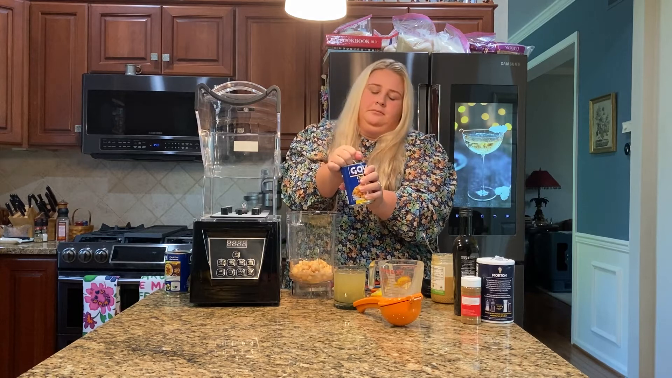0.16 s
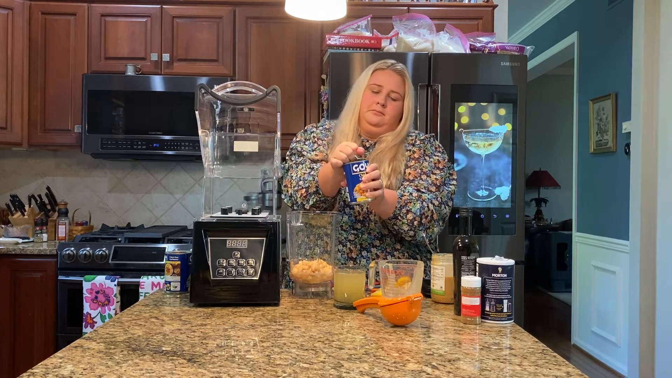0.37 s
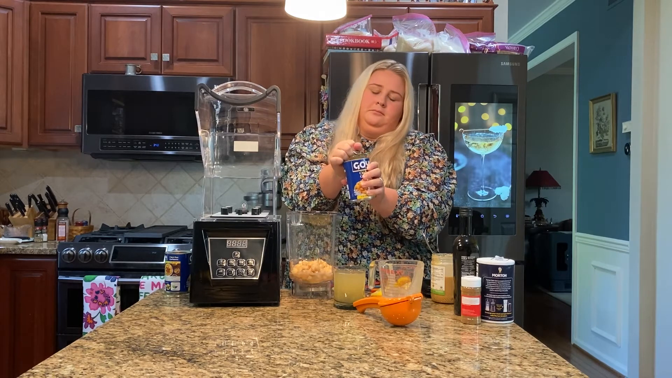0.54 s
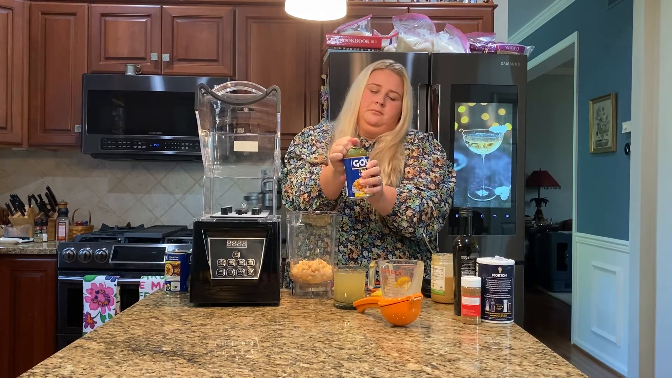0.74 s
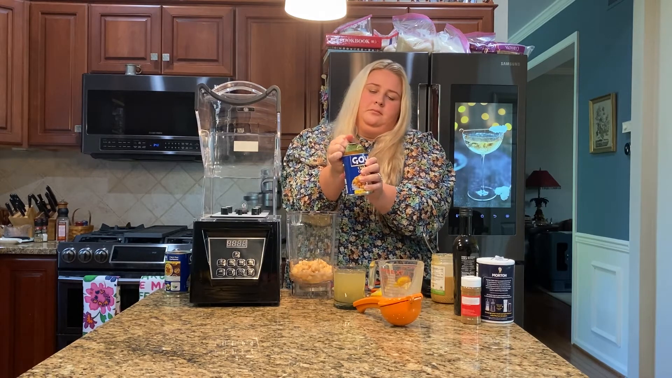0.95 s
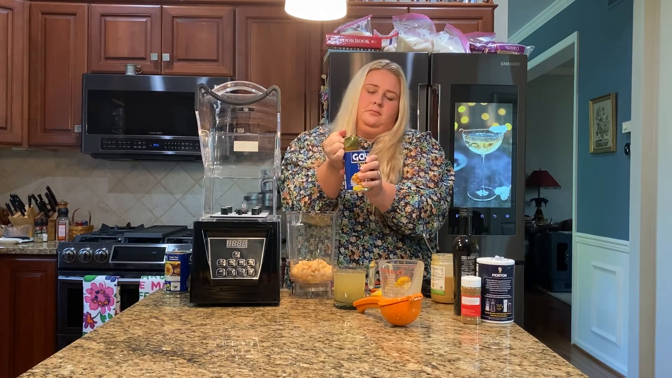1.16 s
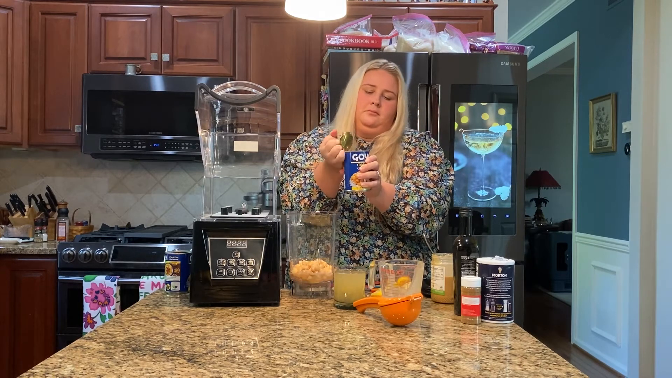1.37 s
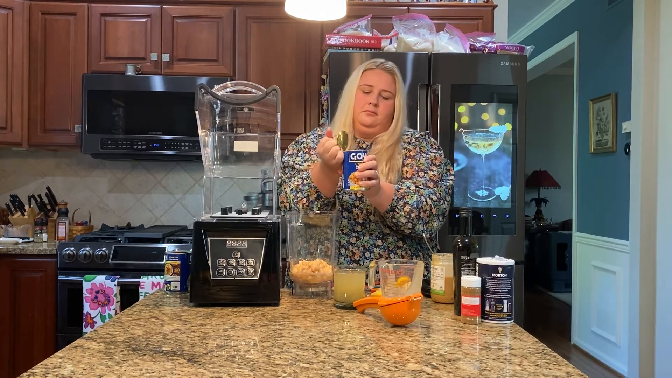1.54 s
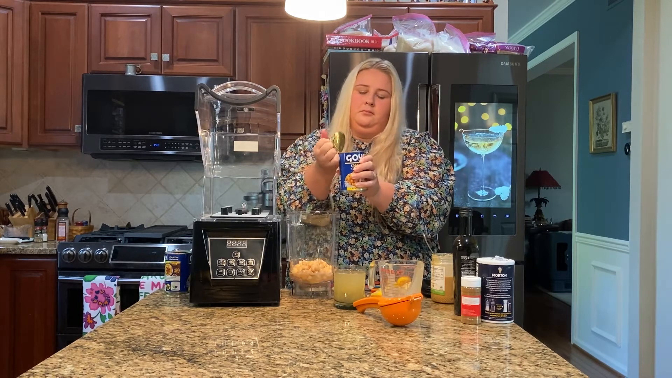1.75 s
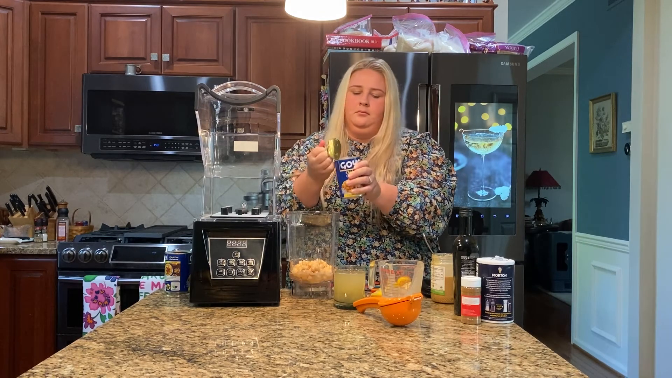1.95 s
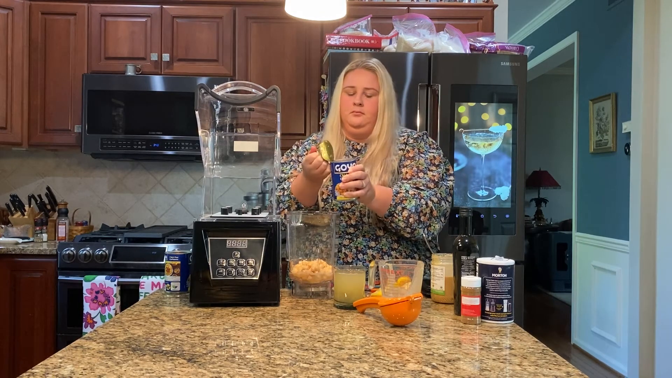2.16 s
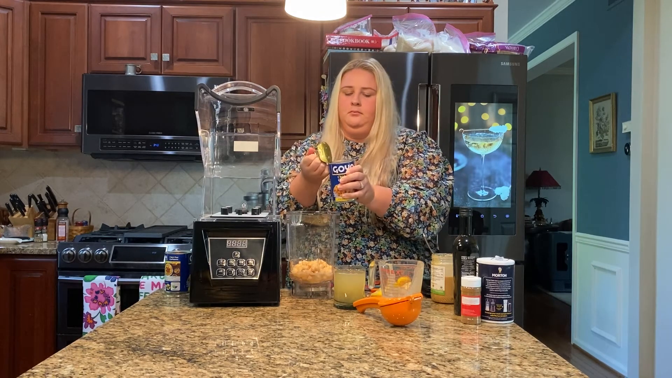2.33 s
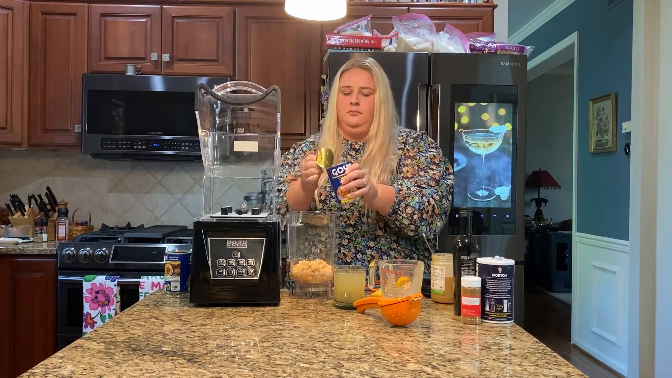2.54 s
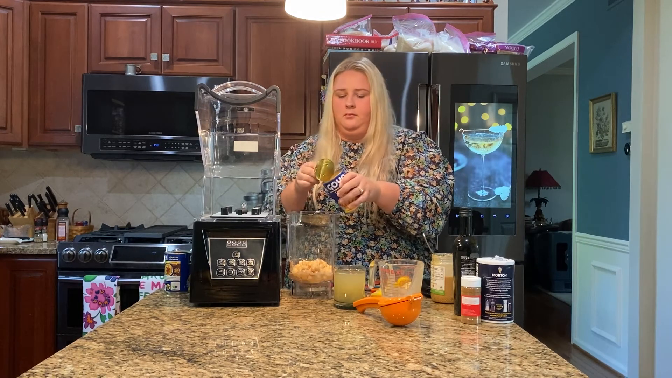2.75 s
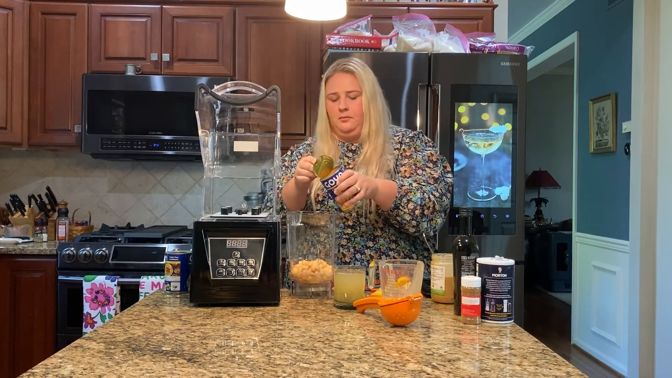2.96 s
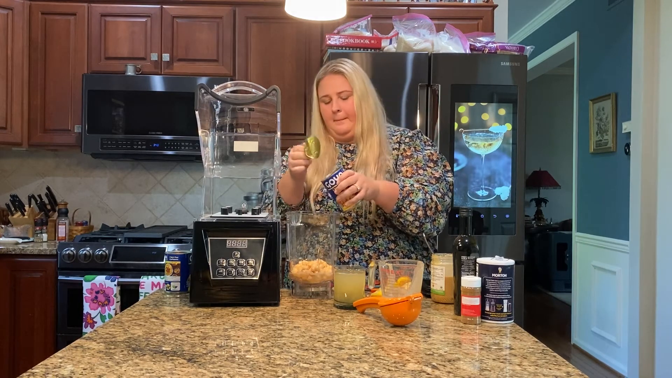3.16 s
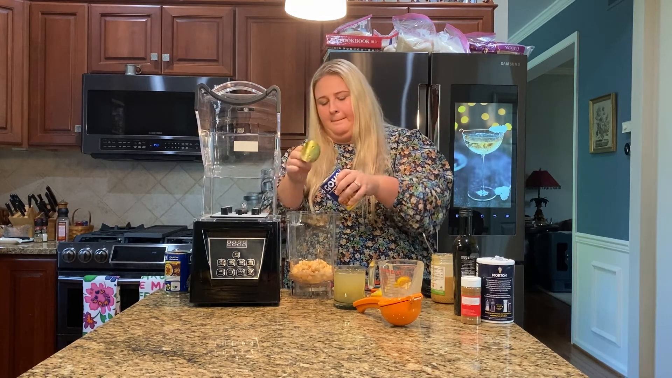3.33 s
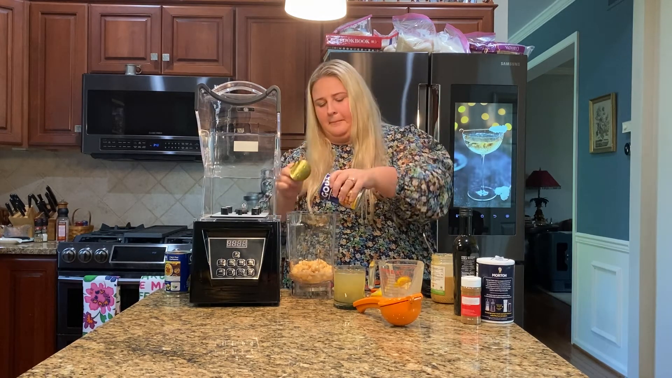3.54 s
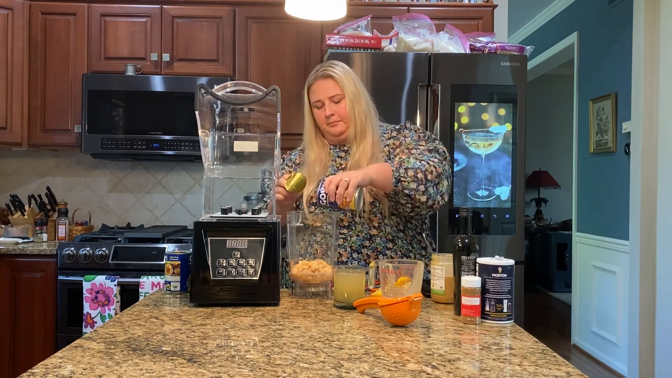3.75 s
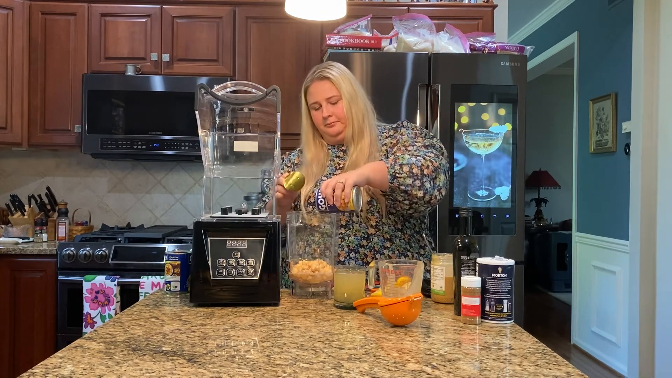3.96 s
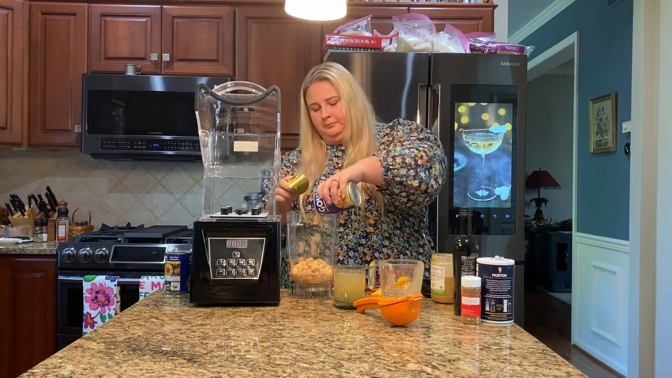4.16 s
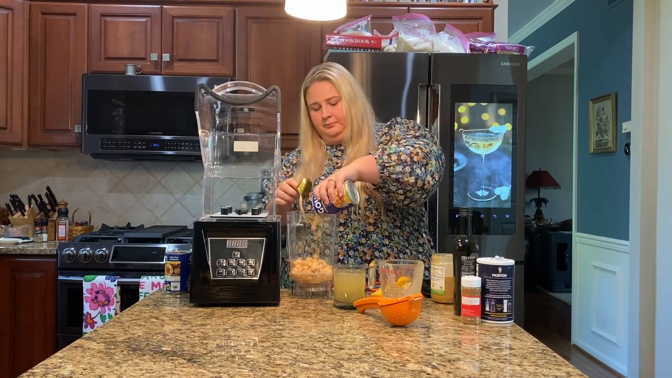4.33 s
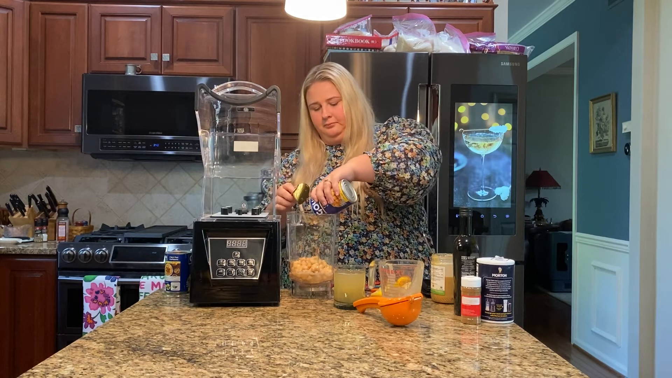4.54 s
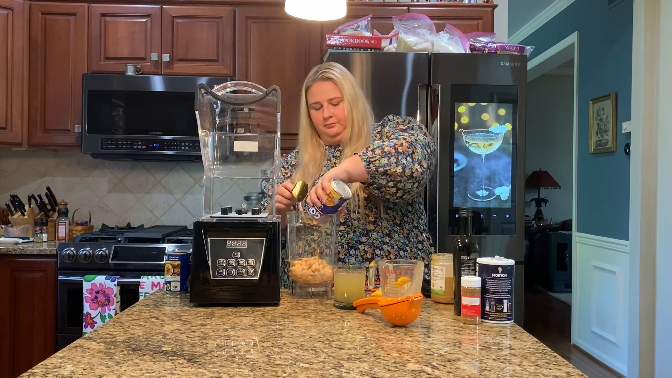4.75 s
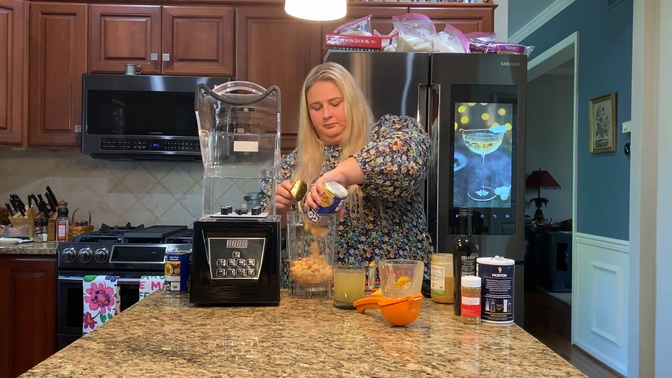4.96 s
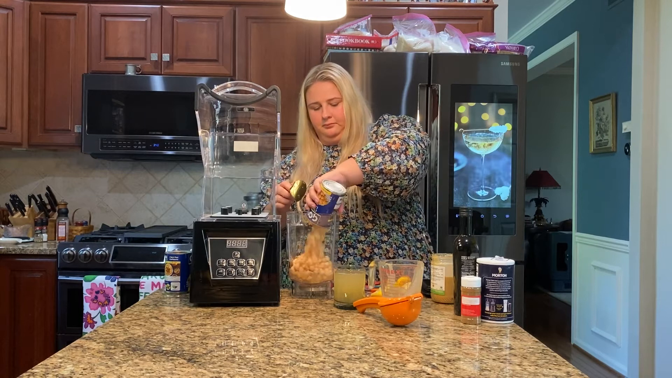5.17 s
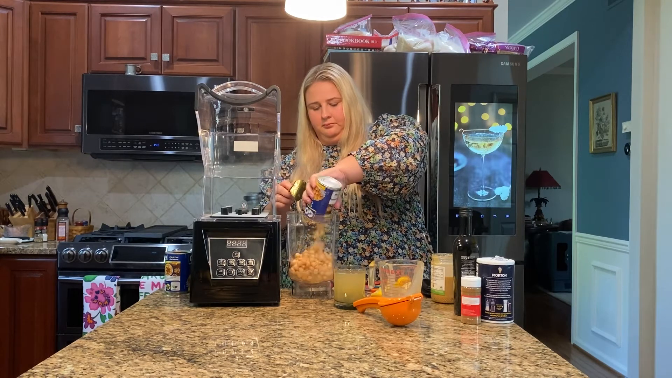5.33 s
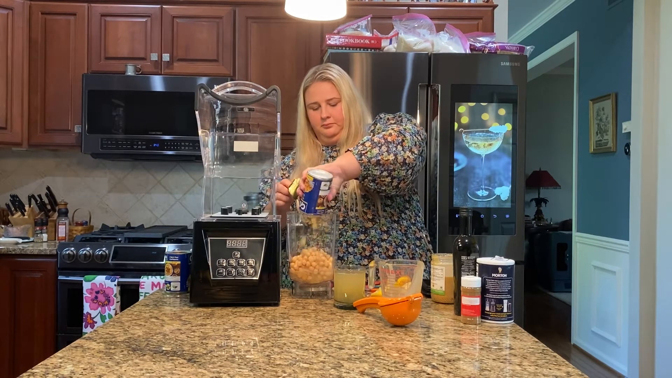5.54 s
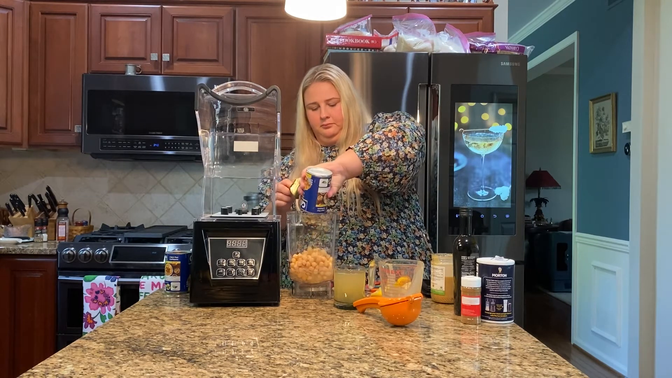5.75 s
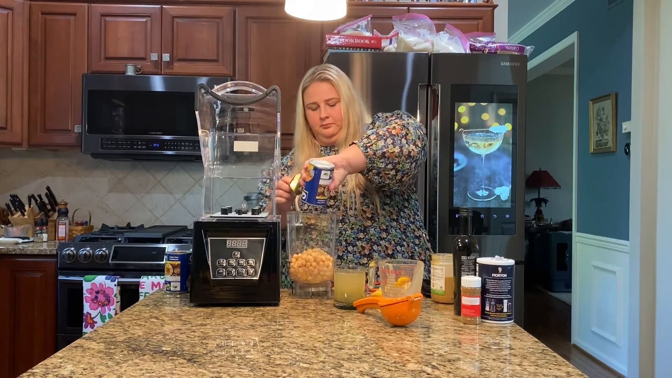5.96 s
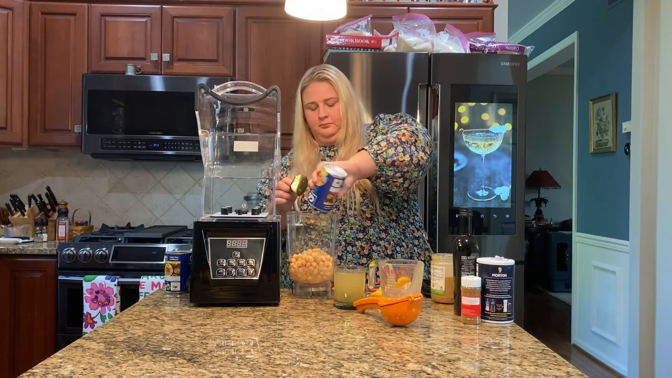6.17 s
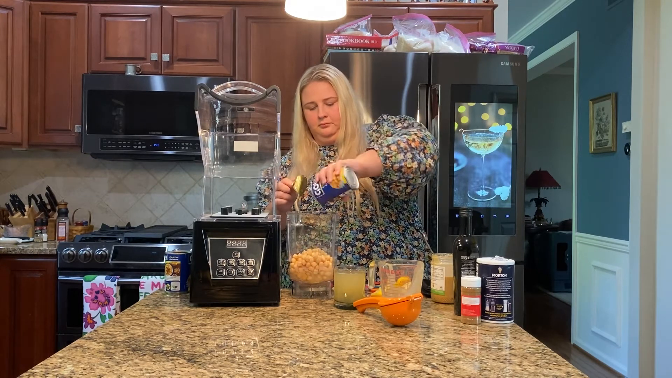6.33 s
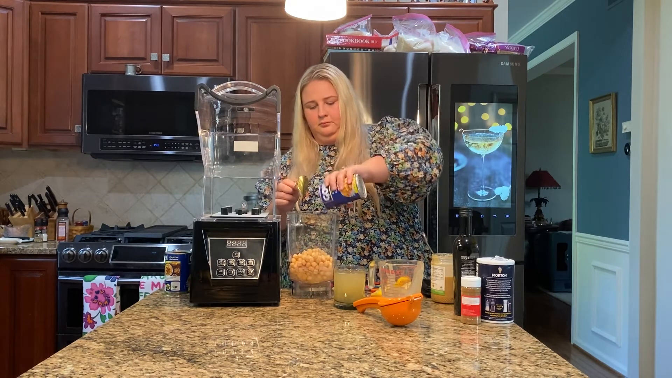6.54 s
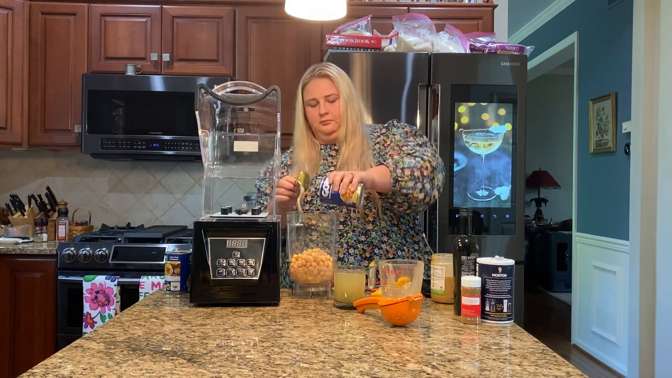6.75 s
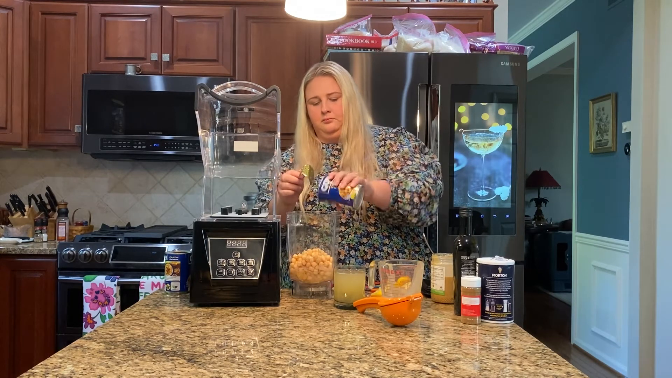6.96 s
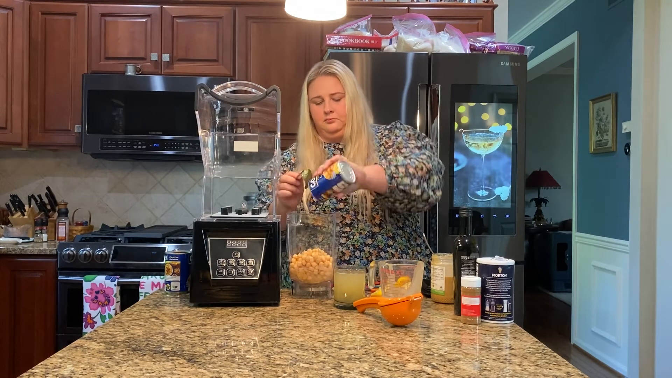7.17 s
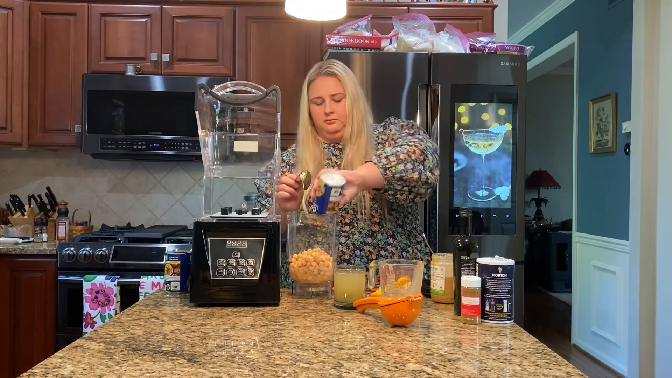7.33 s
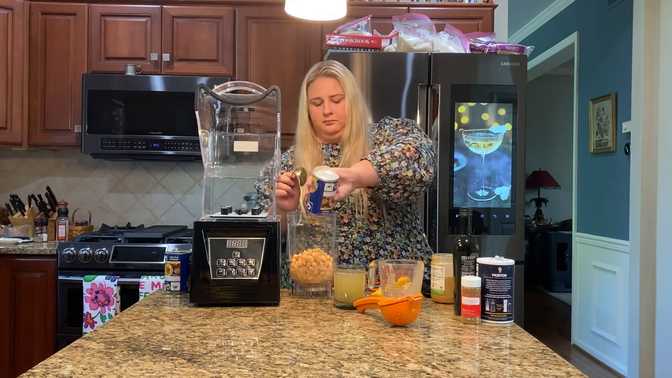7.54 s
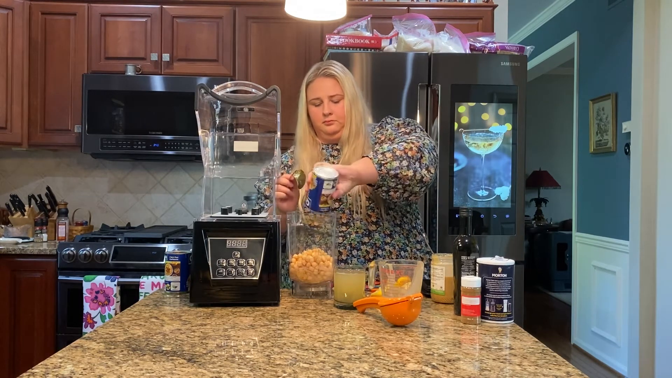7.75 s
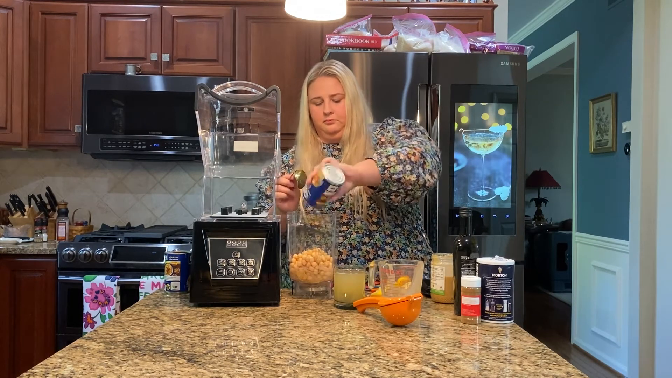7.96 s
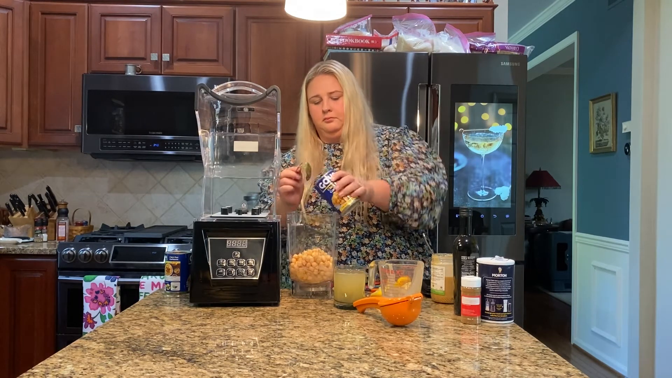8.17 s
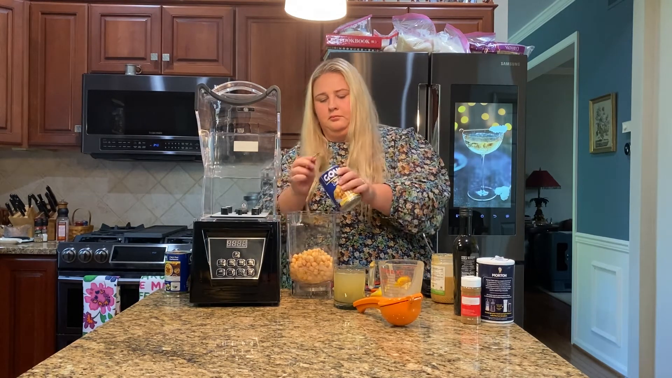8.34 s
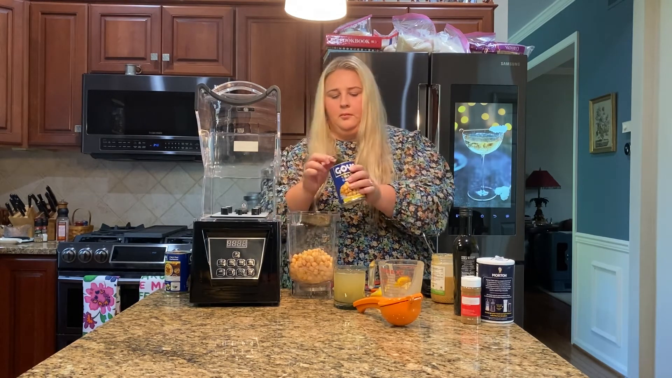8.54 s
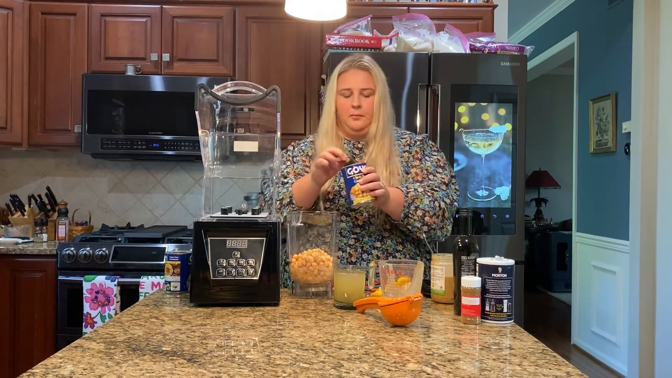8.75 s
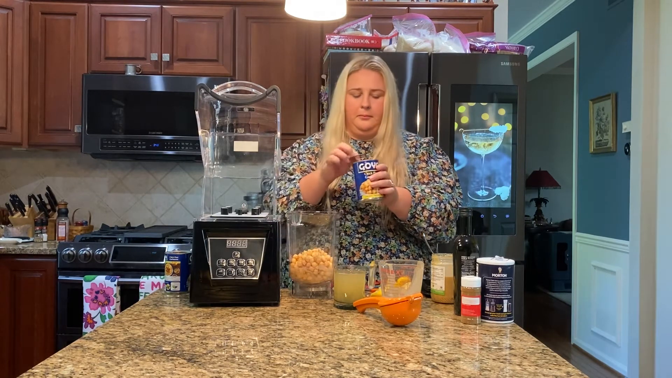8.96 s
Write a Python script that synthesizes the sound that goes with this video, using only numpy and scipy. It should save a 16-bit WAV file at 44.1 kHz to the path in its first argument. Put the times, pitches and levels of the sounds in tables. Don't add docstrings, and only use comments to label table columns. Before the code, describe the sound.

Close tin lid tearing and popping free, two wet clumps booming into a tall container, can knocked three times, lid clinking inside, fridge humming.

```python
import sys
import numpy as np
from scipy import signal
from scipy.fft import rfft, irfft, next_fast_len
from scipy.io import wavfile
from scipy.ndimage import uniform_filter1d, map_coordinates

SR = 44100
rng = np.random.default_rng(int(sys.argv[2]) if len(sys.argv) > 2 else 0)


def rack_gain(trim_db):
    fader = np.asarray(trim_db, float)
    return 10 ** (fader / 20)


def waveform_to_disk(signal):
    frames = np.transpose(np.atleast_2d(signal))
    scaled = np.clip(frames, -1, 1) * 32767
    samples = np.round(scaled).astype(np.int16)
    wavfile.write(sys.argv[1], SR, samples)


N = 396900
TIME = np.arange(N) / SR

# mode_hz, level_db, t60_s
LID = [(1080, -6, 0.034), (1630, 14, 0.022), (1990, 5, 0.049), (2320, -3, 0.016), (2910, 1, 0.068),
       (3850, -16.5, 0.023), (4640, 1.5, 0.099), (5980, 10, 0.033), (8500, -2, 0.029),
       (11310, -17.5, 0.027), (12500, 2, 0.033)]
# mode_hz, level_db, t60_s
SHELL = [(620, -10, 0.15), (1266, -9, 2), (1390, -21, 2.8), (2330, -25, 0.39), (2795, -19.5, 0.23),
         (3100, -25, 0.27), (3170, -14, 0.25), (3810, -1, 0.022), (4240, -15, 4.5), (4650, 4, 5.0),
         (5430, -0.5, 0.23), (5940, -27, 0.81), (7900, -23, 4.6)]
# mode_hz, level_db, t60_s
SIDE = [(1500, -18, 0.048), (2184, 5, 0.044), (2963, 6, 0.043), (3600, -7.5, 0.045), (4970, -12, .02)]
# mode_hz, width_hz, level_db
JAR = [(382, 280, 2.5), (388, 13, -4), (533, 61, -9.5), (800, 230, -27)]
# pitch_hz, level_db (per Hz)
SIZZLE = [(6000, -38.5), (7100, 5), (12400, 1), (14500, -1), (15500, -18), (16300, -55)]
# start_s, peak_db, weight_db (the body's answer), edge_db (sizzle)
CLINK = [
    (8.459, -40, -9, -15.5),
]


def unit(x):
    return x / np.sqrt(np.mean(x ** 2) + 1e-30)


def along(points, hz):
    f, v = np.transpose(points)
    return np.interp(np.log(hz + 1), np.log(f + 1), v)


def wobble(rate):
    knots = rng.standard_normal(int(N * rate / SR) + 4)
    return map_coordinates(knots, [TIME * rate])


def filtered(x, response):
    m = next_fast_len(x.shape[-1] + 4096)
    spectrum = rfft(x, m) * response(np.fft.rfftfreq(m, 1 / SR))
    return irfft(spectrum, m)[..., :x.shape[-1]]


def peak(f, hz, width_hz):
    return 1j * f * width_hz / (hz * hz - f * f + 1j * f * width_hz + 1e-9)


def add(buses, k, s, sound):
    buses[k % len(buses), round(s * SR):][:len(sound)] += sound


def pair(two):
    # pitch_hz, left_right_likeness (0 to 1)
    likeness = [(40, .97), (125, .88), (350, .45), (1300, .2), (2400, .6), (3100, .8), (6200, .5),
                (7300, .93), (8200, 1)]
    turn = lambda hz: np.arccos(np.clip(along(likeness, hz), 0, 1)) / 2
    mid, side = filtered(two, lambda hz: np.array([np.cos(turn(hz)), np.sin(turn(hz))]))
    return np.array([mid + side, mid - side])


def kitchen(buses, wet_db):
    # pitch_hz, t60_s
    decay = [(150, 0.59), (500, 0.34), (2000, 0.42), (6000, 0.31), (13000, 0.2)]
    out = np.zeros((2, N))
    for bus in buses:
        hz, t, z = signal.stft(rng.standard_normal((2, SR // 3)), SR, nperseg=256)
        dying = z * rack_gain(-60 * t / along(decay, hz)[:, None])
        tail = pair(signal.istft(dying, SR, nperseg=256)[1])
        tail = tail / np.linalg.norm(tail[0])
        tail = np.pad(tail, ((0, 0), (round(.006 * SR), 0)))
        echo = signal.oaconvolve(bus[None, :N], tail, axes=1)[:, :N]
        out += bus[:N] + rack_gain(wet_db) * echo
    return out


def fridge():
    # pitch_hz, level_db (per Hz)
    rumble_db = [(12, -60.5), (20, -32.5), (37, -16), (59, -4), (87, -7), (129, -13.5), (182, -14.5),
                 (237, -10.5), (266, -23), (323, -16), (387, -23), (632, -31.5), (1000, -52.5), (1300, -73),
                 (2200, -120)]
    # pitch_hz, level_db (per Hz)
    hiss_db = [(300, -31.5), (550, -4), (800, -6.5), (1800, -11), (3100, -18.5), (6300, -18.5),
               (7600, -19.5), (12700, -19), (13300, -28), (16000, -55.5)]
    # time_s, level_db
    swell = [(0.0, -63), (1.85, -65.5), (2.1, -61), (2.43, -64.5), (2.76, -60.5), (3.41, -65), (4.54, -59),
             (4.74, -62.5), (5.76, -61.5), (6.47, -67.5), (7.37, -63.5), (9.0, -63)]
    rumble = unit(filtered(pair(rng.standard_normal((2, N))), lambda f: rack_gain(along(rumble_db, f))))
    hum = 0.18 * rack_gain(0.58 * wobble(5.3)) * np.sin(2 * np.pi * 60 * TIME + .5 * wobble(2.4))
    hiss = unit(filtered(pair(rng.standard_normal((2, N))), lambda f: rack_gain(along(hiss_db, f))))
    level_db = np.interp(TIME, *np.transpose(swell)) + 1.8 * wobble(7) + 1.2 * wobble(3.5)
    return rack_gain(level_db) * (rumble + hum) + rack_gain(-81 + 0.91 * wobble(7.8)) * hiss


def stroke(start, top, end, db):
    swell_db, fade_db = 13, 26
    gain = np.zeros(N)
    on = slice(round((start - .01) * SR), round((max(top, end) + .01) * SR))
    times = [start - .01, start, top, end, end + .01]
    gain[on] = rack_gain(np.interp(TIME[on], times, [-130, db - swell_db, db, db - fade_db, -130]))
    return gain


def grit(rate, clump_db):
    slips = (rng.random(N) < rate / SR) * rng.exponential(1, N)
    slips = signal.lfilter([1], [1, -np.exp(-1 / (0.0012 * SR))], slips)
    return unit(rng.standard_normal(N) * (0.47 + slips) * rack_gain(clump_db * wobble(29.96)))


def patchy(x, patchy_db):
    z = signal.stft(x, nperseg=256)[2]
    field = uniform_filter1d(rng.standard_normal(z.shape), size=3, axis=0)
    field = uniform_filter1d(field, size=12, axis=1)
    return signal.istft(z * rack_gain(patchy_db * unit(field)), nperseg=256)[1][:N]


def hump(t, ms):
    return (1 - np.exp(-t / (ms / 6000))) / (1 + (t / (ms / 1000)) ** 4)


def burst(ms, size):
    shape = hump(np.arange(size) / SR, ms)
    z = rfft(shape * rng.standard_normal(size))
    x = shape * irfft(z / np.abs(z) ** .8, size) / (shape + .05)
    return x * np.linalg.norm(shape) / np.linalg.norm(x)


def metal(buses, events, modes, ms, wall_db, ring_db, scatter_db, flexes=True):
    wall_share = 0.56
    flex = .02
    panel_width = 0.087
    t = np.arange(8192) / SR
    for k, (s, db, low_db, high_db) in enumerate(events):
        mid_db = wall_db + wall_share * low_db
        colour = [(200, low_db - 0.5), (600, low_db + 9.0), (1300, mid_db + 4.5), (2600, -5.0),
                  (6300, -10.0), (7200, high_db + 3), (12500, high_db), (14600, high_db - 3.5),
                  (15900, high_db - 20.5), (16500, -99.5)]
        bent = 1 + flex * flexes * rng.standard_normal(len(modes))
        stirred = rack_gain(-13 + 7.5 * rng.standard_normal(len(modes)))
        panels = lambda f: 0.93 + np.abs(sum(
            g * peak(f, b * m[0], panel_width * m[0]) for g, b, m in zip(stirred, bent, modes)))
        crack = filtered(burst(ms, size=len(t)), lambda hz: rack_gain(along(colour, hz)) * panels(hz))
        ring = 0
        for b, (hz, level, t60) in zip(bent, modes):
            mode_db = level + along(colour, hz) + rng.normal(0, scatter_db)
            ring = ring + rack_gain(mode_db - 60 * t / t60) * np.sin(2 * np.pi * b * hz * t)
        add(buses, k, s, rack_gain(db) * (crack + rack_gain(ring_db) * ring))


def rings(buses, panels, spread):
    t = np.arange(SR // 3) / SR
    twins = rng.standard_normal((len(panels), 4))
    for k, (s, hz, db, t60) in enumerate(panels):
        beating = sum(np.sin(2 * np.pi * hz * (1 + spread * u) * t) for u in twins[k])
        tones = np.sin(2 * np.pi * hz * t) + 0.45 * beating
        add(buses, k, s, rack_gain(db - 60 * t / t60) * (1 - np.exp(-t / 0.0017)) * tones)


def plops(buses, events, column, slap_db, other_db):
    t = np.arange(SR // 5) / SR
    sag = t + 0.00077 * (1 - np.exp(-t / 0.0016))
    jar = lambda f: sum((-1) ** k * rack_gain(db) * peak(f, hz, w) for k, (hz, w, db) in enumerate(JAR))
    dull = lambda f: peak(f, 737, 410) ** 2 * peak(f, 910, 1200)
    for k, (s, db, hz, ms) in enumerate(events):
        other_hz = (385 if hz > 460 else 540) * rng.normal(1, .04)
        both = np.sin(2 * np.pi * hz * sag) + rack_gain(other_db) * np.sin(2 * np.pi * other_hz * sag)
        wall_gain = rack_gain(-12 + rng.normal(0, 2.8))
        wall_hz = 780.7 * rng.normal(1, 0.068)
        both += wall_gain * np.sin(2 * np.pi * wall_hz * t) * rack_gain(-t / 0.0014)
        push = both * hump(t, ms) * rack_gain(-t / 0.0057)
        slap = filtered(hump(t, 0.79 * ms) * rng.standard_normal(len(t)), dull)
        slap = rack_gain(slap_db + 1.0) * slap / np.abs(slap).max()
        add(buses, k, s, rack_gain(db) * (0.65 * push + column * filtered(push, jar) + slap))


def ring_on(tin):
    # start_s, pitch_hz, level_db, t60_s
    left_ringing = [(0.15, 2900, -59, 0.15), (0.14, 3600, -51, .15), (0.395, 3100, -54, 0.03),
                    (0.424, 3010, -59, .03), (0.423, 4700, -50, 0.025), (0.121, 1536, -41, .03),
                    (0.121, 2060, -42, .03), (0.381, 1492, -46, 0.062), (2.734, 2110, -49.5, .03),
                    (2.749, 2080, -47.5, .035), (2.749, 2890, -43, .03), (2.766, 2400, -42, 0.054),
                    (2.987, 760, -54, 0.021), (0.975, 1007, -59.5, 0.22), (1.552, 2440, -67.5, 0.058),
                    (2.585, 3970, -54, 0.11), (2.635, 764, -65, 0.069), (2.92, 4800, -63.5, .08),
                    (2.988, 2757, -50, 0.12), (2.988, 6130, -50, 0.15), (2.988, 12500, -36, 0.036),
                    (7.06, 1293, -74, 0.12), (7.311, 3570, -64, 0.32), (7.311, 2360, -55, 0.14),
                    (7.801, 2200, -53.5, 0.087), (7.801, 1587, -53, 0.078)]
    rings(tin, left_ringing, spread=.022)


def drag_lid(tin):
    # start_s, peak_db, weight_db (the body's answer), edge_db (sizzle)
    brushes = [
        (6.9673, -57, 6, 1.5),
        (7.0221, -54.5, 4.5, 0.5),
        (7.0563, -51.5, 5.5, -9),
        (7.1844, -64.5, 6, 4),
        (8.0561, -56.5, 7, 3.5),
        (8.08, -53, -13.5, -0.5),
        (8.3938, -60, 10, -9),
    ]
    drags = [
        (0.1476, -32, -12.5, -15),
        (0.669, -59, 5, -5),
        (0.9424, -47, -6.5, -9.5),
        (1.2017, -47, -8.5, -20.5),
        (2.918, -41.5, -30, -10),
        (8.5306, -44, -7, -11),
        (8.938, -44, -11.5, -6),
    ]
    metal(tin, brushes, LID, ms=4.2, wall_db=-29.0, ring_db=-22.5, scatter_db=0.5)
    metal(tin, drags, LID, ms=25.6, wall_db=-8, ring_db=-33.0, scatter_db=3)


def knock_can(tin):
    # start_s, peak_db, weight_db (the body's answer), edge_db (sizzle)
    knocks = [
        (7.3082, -25.5, -8.5, -11),
        (7.8015, -40, 10.5, -9.5),
        (8.144, -39, 4.5, -9),
    ]
    # start_s, peak_db,
    # pitch_hz, contact_ms
    thuds = [
        (3.831, -48, 187.4, 12.2),
        (7.312, -22, 475, 9.8),
        (7.325, -29, 288, 2.7),
        (7.351, -44.5, 73.4, 145),
        (7.801, -28.5, 428, 11.3),
        (7.81, -33, 265, 6.6),
        (8.146, -24.5, 496, 9.6),
        (8.158, -28, 224, 5.8),
    ]
    metal(tin, knocks, SIDE, ms=4.4, wall_db=0.0, ring_db=-20, scatter_db=2.0)
    plops(tin, thuds, column=0.25, slap_db=-24, other_db=-5.0)


def drop_lid(tin):
    # start_s, peak_db, weight_db (the body's answer), edge_db (sizzle)
    taps = [
        (8.6044, -31, -4, -11.5),
        (8.7425, -38.5, -4, -10),
        (8.7585, -40, -10, 0.5),
        (8.7811, -44.5, -20, -9),
        (8.8425, -39, -9.5, 0.5),
    ]
    # mode_hz, level_db, t60_s
    rim = [(650, -4, 0.049), (1364, -8, 0.38), (2254, -8, 0.26), (3060, -9, 0.028), (3260, -3, 0.045),
           (3510, -30, 0.1), (6400, -21, 0.14)]
    # start_s, pitch_hz, level_db, t60_s
    rattle = [(8.459, 1350, -52, 0.21), (8.459, 2270, -59, 0.32), (8.459, 2896, -60.5, .15),
              (8.459, 3240, -51, 0.052), (8.545, 2800, -59, 0.12), (8.53, 6400, -65, 0.1),
              (8.535, 3760, -68, .2), (8.605, 629, -45, 0.055), (8.605, 1359, -55.5, 0.36),
              (8.605, 1243, -55, .2), (8.605, 2297, -62, 0.28), (8.605, 2860, -59.5, 0.76),
              (8.605, 3180, -53, 0.22), (8.605, 4670, -57, 0.19), (8.605, 6180, -57, .11),
              (8.746, 3230, -50, 0.093), (8.746, 575, -63, 0.093), (8.746, 4650, -56, .07),
              (8.746, 5486, -54.5, 0.24), (8.746, 7040, -69, 0.11), (8.845, 620, -63, 0.19),
              (8.845, 2014, -57.5, 0.082), (8.845, 2690, -58, 0.22), (8.845, 4307, -55.5, 0.14),
              (8.845, 5000, -56, 0.081), (8.845, 5670, -55.5, 0.17), (8.78, 12500, -48, .03),
              (8.846, 12500, -41, .03), (8.76, 11500, -45, .03), (8.845, 7300, -62, .2),
              (8.94, 630, -62, 0.13), (8.94, 2000, -60.5, .15), (8.94, 2800, -59.5, .2),
              (8.94, 5510, -63, 0.16)]
    held = [(hz, db, min(t60, .11)) for hz, db, t60 in SHELL + SHELL + rim]
    metal(tin, taps, held, ms=3.7, wall_db=-2.5, ring_db=-22, scatter_db=3.5)
    metal(tin[1:], CLINK, rim + SHELL[4:7], ms=4.8, wall_db=5.0, ring_db=-0.5, scatter_db=4, flexes=False)
    rings(tin, rattle, spread=.014)


def peel_lid(tin):
    # start_s, peak_db, weight_db (the body's answer), edge_db (sizzle)
    peel = [(0.1209, -27, -27, -2.5), (0.1646, -32, -11, -16), (0.3835, -45, 0.5, -3),
            (0.3943, -41.5, -3, -9), (0.4076, -44, -6.5, -0.5), (0.4245, -46.5, -3, -5.5),
            (0.1527, -30, -12, -7), (0.485, -59, -2, -8), (0.525, -54, -9.5, -9), (0.5431, -51, 3, -17),
            (0.6105, -50.5, 1, -14), (0.7817, -45.5, -7.5, -12), (0.834, -65, -7.5, -10),
            (0.8592, -48, -14, -11), (0.9733, -35, -22.5, -8.5), (0.989, -38, -14, -12),
            (1.104, -51, -22.5, -13), (1.319, -51.5, -2, -15), (1.5516, -48, -18, 0)]
    bend = [(1.9512, -59.5, -13, -18), (1.966, -56, -7, -12), (2.0094, -51, -5, 5),
            (2.0325, -44, -5.5, -37), (2.3717, -62.5, 9.5, -7), (2.551, -50, -15, -8),
            (2.571, -36, -27.5, -5.5), (2.581, -36.5, -11, -3), (2.7336, -39.5, -11, -16.5),
            (2.7495, -34.5, -4, -5.5), (2.767, -26, -9, -6), (3.4243, -50, -12, 1)]
    snap = [
        (2.9867, -20, -16, -1.5),
    ]
    metal(tin, peel, LID, ms=4.2, wall_db=-2.5, ring_db=-31.5, scatter_db=2.0)
    metal(tin, bend, LID, ms=3.6, wall_db=-9, ring_db=-26, scatter_db=2)
    metal(tin[2:], snap, SIDE, ms=2.2, wall_db=-8, ring_db=-28.0, scatter_db=0.5)


def mouth(move, hz):
    """One jerk of the seam in the can's mouth: an empty stub, replaced by the full definition just below."""


def mouth(bent, move, hz):
    mouth_tones = [(1, -2), (.84, -7), (0.58, -15.5), (1.3, -14)]
    gain = stroke(*move)
    on = gain > 0
    gain[on] *= sum(rack_gain(db) * np.sin(2 * np.pi * share * hz * t[on])
                    for t, (share, db) in zip(bent, mouth_tones))
    return gain


def rubbing():
    # start_s, strongest_s, end_s, level_db, edge_db
    rubs = [(0.109, 0.118, 0.13, -57, -10), (5.22, 5.324, 5.45, -71.5, -14),
            (0.248, 0.566, 1.34, -64.5, -11.5), (0.903, 0.99, 1.54, -60, -13),
            (0.16, 0.22, 0.39, -66, -5.5), (1.05, 1.365, 1.33, -63.5, -7.5),
            (1.684, 1.975, 2.16, -72, -0.5), (1.48, 1.56, 1.75, -71.5, -1), (2.3, 2.536, 2.61, -74, -4.5),
            (2.916, 2.952, 3.205, -59, 4.5), (3.273, 3.54, 3.85, -71.5, -4), (3.895, 4.309, 5.4, -82, -10),
            (4.898, 5.118, 5.28, -60.5, -12.5), (5.122, 5.238, 5.71, -67.5, -13.5),
            (5.303, 5.423, 6.17, -78, -10.5), (6.9, 7.02, 7.45, -78, -2.5), (7.3, 7.36, 7.6, -75, -3.5),
            (7.8, 7.84, 9.3, -82, -6), (8.05, 8.2, 8.8, -80, 0), (8.424, 8.47, 8.4, -64, -10),
            (8.571, 8.73, 9.8, -53.5, -13.5)]
    # start_s, strongest_s, end_s, level_db, resonance_hz
    seam_jerks = [(0.115, 0.123, 0.17, -47, 1894), (0.138, 0.174, 0.3, -47.5, 1051),
                  (0.145, 0.168, 0.37, -53, 1742), (0.362, 0.398, 0.49, -51.5, 1151),
                  (0.391, 0.42, 0.6, -54, 1331), (0.503, 0.59, 1.1, -65.5, 1988),
                  (0.605, 0.67, 0.88, -61, 2063), (0.757, 0.787, 1.08, -67.5, 1944),
                  (0.925, 0.99, 1.13, -51, 2156), (1.08, 1.23, 1.32, -65.5, 2290),
                  (1.255, 1.326, 1.37, -67, 2440), (1.48, 1.537, 1.42, -65.5, 2407),
                  (1.5, 1.55, 1.56, -79, 1604), (1.943, 1.967, 2.1, -73.5, 2910),
                  (1.957, 2.034, 2.2, -78, 912), (2.75, 2.772, 2.72, -57, 2364),
                  (2.762, 2.78, 2.85, -55, 1750), (0.653, 0.67, 0.77, -54.5, 1780),
                  (2.915, 2.944, 3, -55.5, 2188), (2.91, 2.93, 2.84, -49, 3100)]
    # pitch_hz, level_db (per Hz)
    scrape = [(250, -8), (600, 5.5), (1000, -7), (2200, -8.5), (3500, -7.5), (6500, -6.5), (7500, -24)]
    sheet = lambda modes, width_hz: lambda f: (
        rack_gain(along(scrape, f)) * (.45 + sum(peak(f, m[0], width_hz) for m in modes)))
    lid = unit(filtered(grit(440, clump_db=3.5), sheet(LID, 900)))
    can = .6 * unit(filtered(grit(900, clump_db=1.5), sheet(SHELL, 45)))
    body = patchy(np.where(TIME < CLINK[0][0], lid, can), patchy_db=3.5)
    sizzle = unit(filtered(grit(750, clump_db=6), lambda f: rack_gain(along(SIZZLE, f))))
    band = unit(filtered(grit(4000, clump_db=2), lambda f: 1 / (1 + (f / 190) ** 2)))
    bent = [np.cumsum(1 + .04 * wobble(14)) / SR for _ in range(4)]
    seam = band * sum(mouth(bent, move, hz) for *move, hz in seam_jerks)
    strokes = sum(stroke(*move) * (rack_gain(-6.0) * body + rack_gain(edge_db + 2.5) * sizzle)
                  for *move, edge_db in rubs)
    return strokes + rack_gain(4.5) * seam


def ticks(buses):
    # start_s, peak_db, pitch_hz, sizzle_db
    pea_ticks = [(3.97, -60, 2000, -19), (4.1869, -53, 1980, -11.5), (4.374, -52, 1930, -37.5),
                 (4.4268, -63, 1860, 0.5), (4.8249, -66.5, 2900, -21), (4.9152, -56.5, 3260, -23),
                 (5.0155, -52, 3720, -5), (5.1178, -64, 6860, -9), (5.1393, -61, 3400, -2),
                 (5.1532, -55.5, 4550, 3.5), (5.2165, -59, 2840, -17), (5.2879, -58.5, 6200, 3),
                 (5.36, -57.5, 4500, -8), (5.3857, -58.5, 6500, -7), (5.4157, -69, 4600, -11),
                 (5.4834, -70.5, 4900, 8), (5.5223, -57.5, 4670, 0.5), (5.6161, -63, 6300, 3),
                 (6.6228, -72.5, 2270, 0)]
    t = np.arange(SR // 20) / SR
    for k, (s, db, hz, sizzle_db) in enumerate(pea_ticks):
        spit = lambda f: 2.14 * peak(f, hz, 0.29 * hz) * peak(f, hz, hz) + rack_gain(sizzle_db + along(SIZZLE, f))
        add(buses, k, s, rack_gain(db) * filtered(hump(t, 5.0) * rng.standard_normal(len(t)), spit))


def rolling():
    # start_s, strongest_s, end_s, level_db
    rumble = [
        (3.811, 4.373, 4.81, -44.5),
        (4.827, 5.213, 5.87, -42.5),
    ]
    jar = lambda f: sum(rack_gain(db) * peak(f, hz, w) for hz, w, db in JAR) * peak(f, 290, 190)
    return rack_gain(-10.5) * sum(stroke(*move) for move in rumble) * unit(filtered(grit(40, clump_db=4.0), jar))


def pour(jar):
    # start_s, peak_db, pitch_hz, contact_ms
    first_pour = [(3.831, -46, 419, 13), (3.93, -53.5, 528, 40), (4.027, -47, 403, 15),
                  (4.069, -39.5, 520, 18), (4.187, -19, 537, 14), (4.215, -30.5, 446, 12),
                  (4.29, -26, 528, 19), (4.334, -29.5, 546, 19), (4.336, -38, 870, 17),
                  (4.378, -34.5, 800, 11), (4.41, -43, 875, 20), (4.44, -40.5, 535, 13),
                  (4.27, -41.5, 530, 10), (4.373, -19.5, 521, 8.9), (4.419, -35, 519, 19),
                  (4.49, -38, 402, 8.5), (4.552, -62, 397, 12)]
    second_pour = [(4.851, -58.5, 352, 37), (4.916, -55.5, 298, 21), (4.965, -45, 291, 17),
                   (5.018, -42.5, 390, 81), (5.063, -22.5, 521, 12), (5.089, -34, 540, 20),
                   (5.112, -37, 409, 10), (5.154, -34.5, 367, 19), (5.181, -25, 370.6, 22),
                   (5.255, -24.5, 510, 14.8), (5.279, -34, 485, 15), (5.309, -39.5, 384, 26),
                   (5.358, -34.5, 388, 17), (5.436, -28.5, 537, 12), (5.596, -35, 498, 14.4),
                   (5.786, -47, 352, 14), (5.810, -39, 388, 20), (5.838, -54.5, 352, 25),
                   (6.154, -58.5, 320, 5.7)]
    plops(jar, first_pour, column=0.49, slap_db=-19.5, other_db=-9.0)
    plops(jar, second_pour, column=0.5, slap_db=-30, other_db=-5.5)
    jar[1, :N] += rolling()
    return filtered(jar, lambda f: 1 / (1 + 1j * f / 2200) ** 2)


def scene():
    tin, jar = np.zeros((4, N + SR)), np.zeros((3, N + SR))
    ring_on(tin)
    drag_lid(tin)
    knock_can(tin)
    drop_lid(tin)
    peel_lid(tin)
    tin[0, :N] += rubbing()
    ticks(tin)
    jar = pour(jar)
    return kitchen(tin, wet_db=0.5) + kitchen(jar, wet_db=-5.5) + fridge()


def top_cut(x):
    return signal.sosfilt(signal.butter(12, 16470, fs=SR, output="sos"), x)


def record(dry):
    # pitch_hz, left_minus_right_db
    lean = [(40, -1.5), (300, -3), (2200, -1.8), (5200, -4), (6500, -2.5), (7300, 1), (8300, 0)]
    # pitch_hz, left_lead_rad
    lead = [(1200, .25), (5200, -1.1), (8550, 3.08), (9450, 3.2), (11500, 5.8), (12800, 6.35), (13400, 7.3),
            (16500, 10.6)]
    half = lambda f: rack_gain(along(lean, f) / 2) * np.exp(.5j * np.interp(f, *np.transpose(lead)))
    ports = filtered(dry, lambda f: np.array([half(f), 1 / half(f)]))
    return top_cut(ports)


dry = scene()
out = record(dry)
waveform_to_disk(out)
```